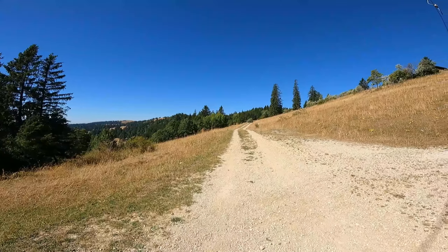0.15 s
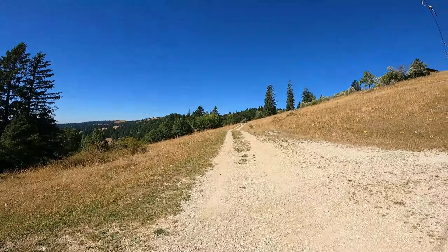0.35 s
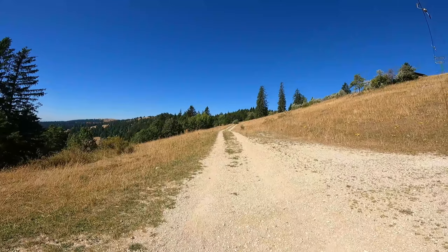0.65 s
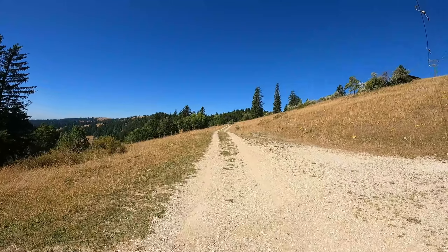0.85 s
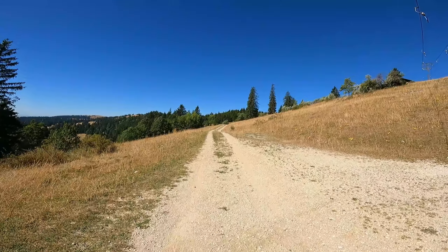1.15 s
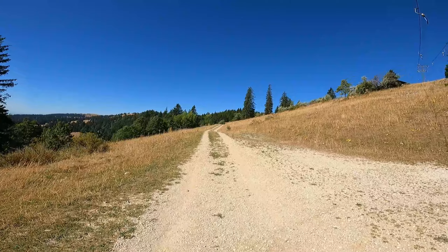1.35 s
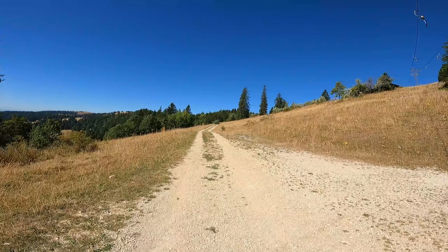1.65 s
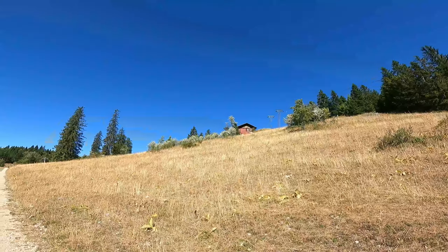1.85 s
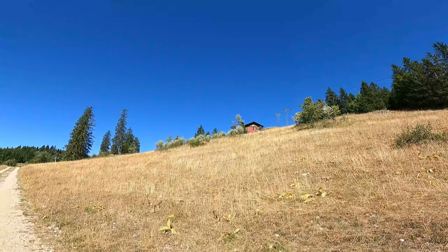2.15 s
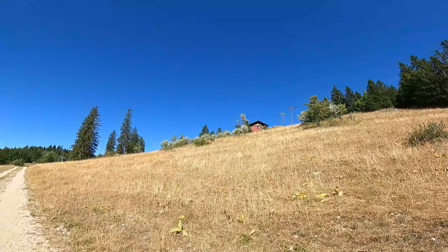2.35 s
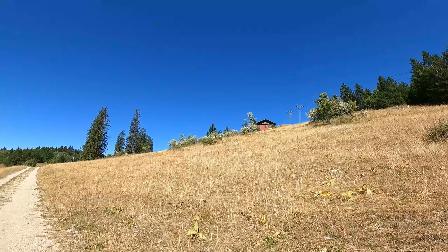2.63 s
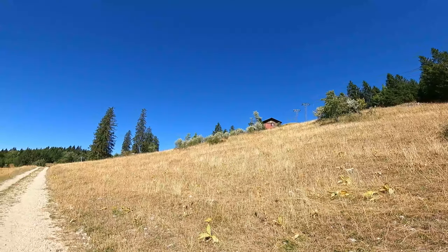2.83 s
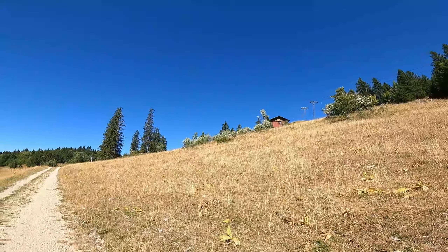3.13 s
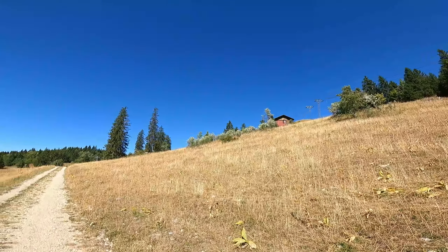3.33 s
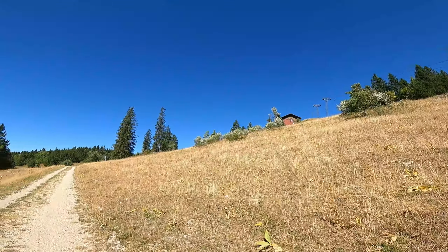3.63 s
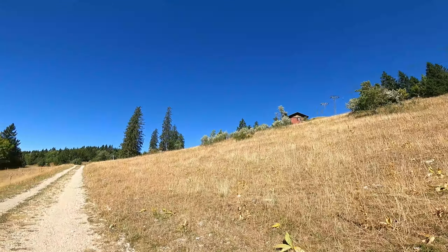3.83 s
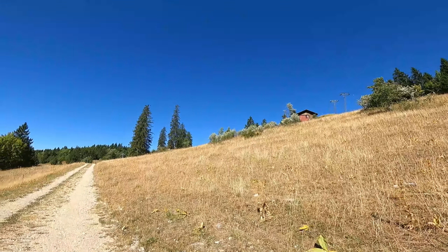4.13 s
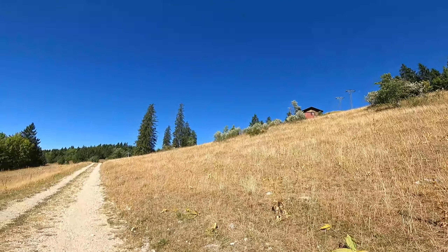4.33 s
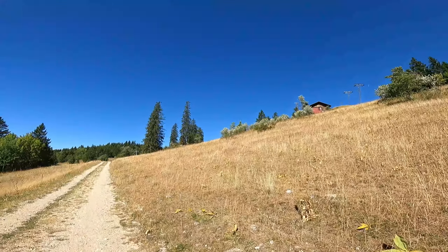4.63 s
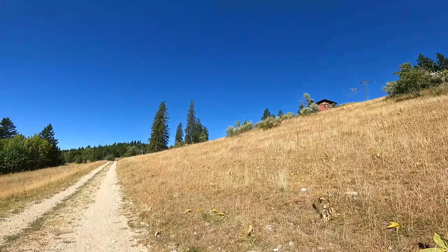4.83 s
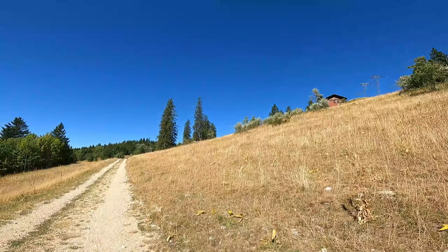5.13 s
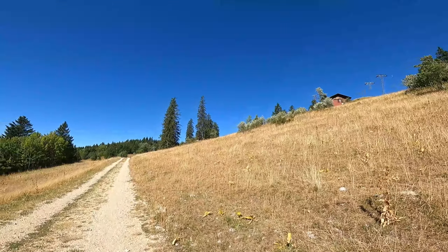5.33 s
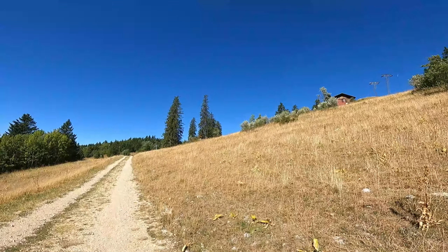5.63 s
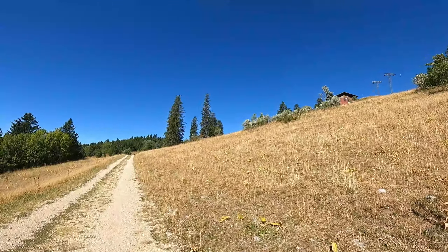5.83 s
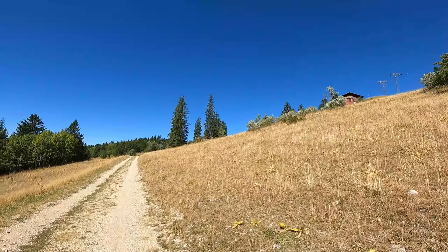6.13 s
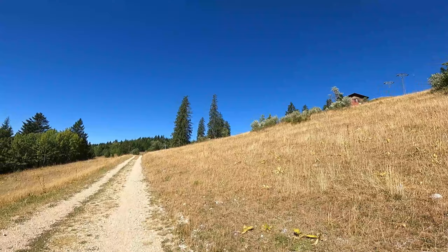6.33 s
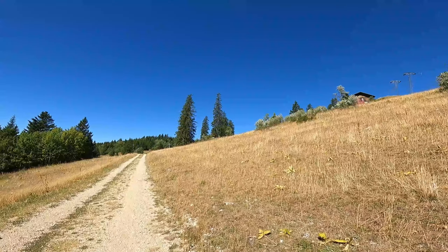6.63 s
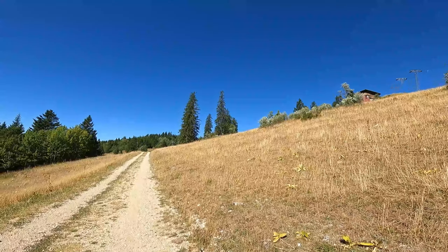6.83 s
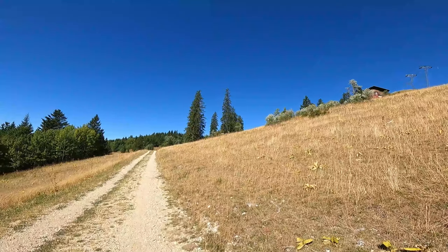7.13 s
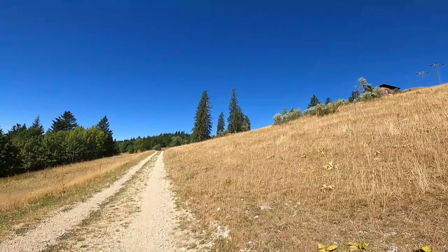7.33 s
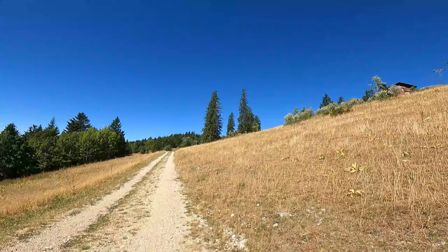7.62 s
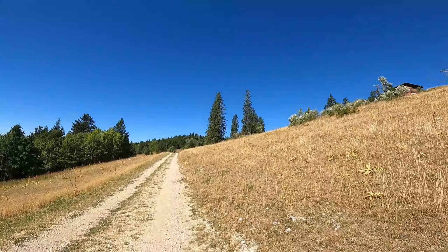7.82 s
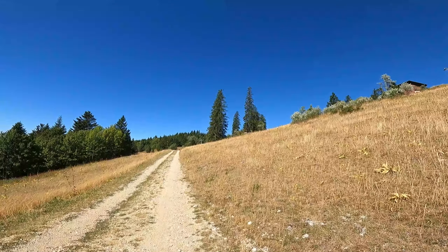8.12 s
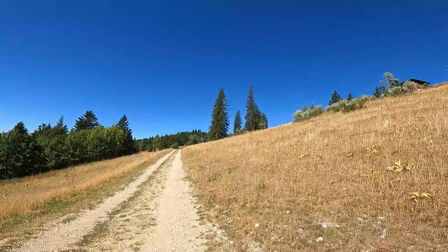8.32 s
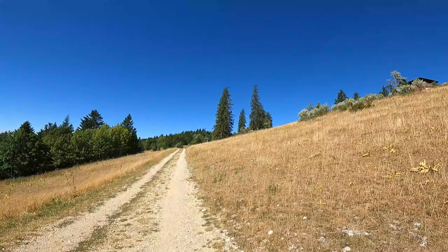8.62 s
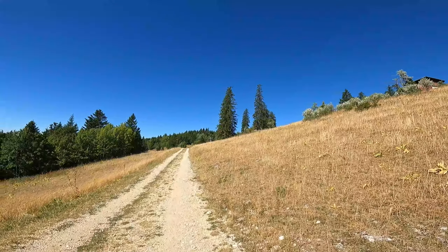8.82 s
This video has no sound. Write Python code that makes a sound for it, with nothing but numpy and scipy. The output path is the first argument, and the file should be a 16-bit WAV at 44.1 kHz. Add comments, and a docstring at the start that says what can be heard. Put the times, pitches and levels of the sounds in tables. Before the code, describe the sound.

Outdoors on an open grassy hillside, one walker crunches along a stony track, scuffing between footfalls. Puffs of wind slap the handheld microphone early, calm down, then return hard and hoarse past five seconds. Small stones squeak, a metal fitting clinks faintly, and a very faint, high grasshopper rasp pulses in the calmer middle over soft airy hiss.

```python
"""A walker's boots crunch along a dry gravel track, heard from a small hand-held camera in gusty wind.
Stones of three sizes grind as clumpy noise, louder at each footfall and scuff, over a steady bed.
Single pebbles pop, grit snaps, stones squeak and a metal fitting clinks, each from a list of times.
Wind is low noise with gusts and puffs; a grasshopper rasps in pulsed high noise over soft hiss.
The sound starts in stereo, dips briefly, goes on in mono and fades out at the end."""
import sys
import numpy as np
from scipy import signal
from scipy.fft import rfft, irfft, next_fast_len
from scipy.io import wavfile
from scipy.ndimage import uniform_filter1d, map_coordinates

SR = 44100
rng = np.random.default_rng(int(sys.argv[2]) if len(sys.argv) > 2 else 0)


def transcribe(signal):
    """Save signal, clipped to [-1, 1], as a 16-bit WAV file at the path in sys.argv[1]."""
    frames = np.atleast_2d(signal).T
    limited = np.clip(frames, -1, 1)
    pcm = np.round(limited * 32767).astype(np.int16)
    wavfile.write(sys.argv[1], SR, pcm)


N = 395577
MONO_S = 1.815  # stereo turns to mono here

# footfalls: t/s, hold/s, rise/(dB/s), fall/(dB/s), crunch level/dB,
# then big stones, grit and heel thud, each level/dB over the crunch
FOOTFALLS = [(0.285, 0.0041, 223, 180, -52, 2.5, -8.5, -11), (.897, 0, 170, 220, -48.5, -10, -12.5, 2),
             (1.438, 0, 137, 152, -52, -4.5, -11, -7), (2.033, 0.011, 520, 99, -47, 3.5, -12, 0),
             (2.599, 0, 334, 110, -52.5, 3, -10.5, 15.5), (3.225, 0.051, 303, 90, -53.5, -4.5, -17, -16),
             (3.885, 0.0035, 150, 137, -52, -5, -21, -24), (4.388, 0.064, 267, 94, -56.5, 3, -13, 14),
             (5.041, 0.026, 106.5, 150, -52, 1, -22, -1), (5.606, 0, 483, 320, -40.5, -7.5, -18.5, -10),
             (6.277, 0, 253, 136, -42.5, -1.5, -15.5, -21),
             (6.833, 0.079, 420, 280, -43.5, -2.5, -22.5, 5.5), (7.419, 0.053, 153, 131, -51, 0.5, -9.5, 1),
             (8.068, 0.011, 81, 270, -48.5, 2, -12.5, 7.5), (8.587, 0.024, 130, 169, -47, 0, -21.5, 6)]
# brief scuffs of heel, toe and sole: t/s, crunch level/dB, big stones and grit, each level/dB over the crunch
SCUFF_TIMES = [(0.176, -52.5, 1.5, -16), (0.763, -52.5, 2, -9), (1.104, -51.5, -1, -6),
               (1.237, -60, 14.5, -20), (1.323, -54, -3, -10), (2.197, -49.5, -1.5, -14.5),
               (2.448, -59, -1, -15), (2.67, -50, -4, -17), (3.04, -62, 1.5, -24), (3.235, -52.5, 8.5, -13),
               (3.481, -48.5, 5, -12), (3.583, -65, 8, -23), (3.783, -54, -21, -30),
               (4.254, -60.5, -23, -17), (4.455, -54.5, 10.5, -14), (5.159, -55.5, 5.5, -21),
               (5.525, -41, 10, -22), (5.68, -40, -15, -27), (5.933, -57, 5, -13.5),
               (6.227, -34.5, -1, -15), (6.32, -40, -7.5, -18), (6.474, -51.5, -11, -12.5),
               (6.721, -44.5, 10.5, -25), (6.89, -50.5, -8.5, -7), (7.173, -51.5, 5, -21),
               (7.392, -55.5, 6.5, 0), (7.525, -50.5, -0.5, -14), (7.734, -52.5, 4, -13),
               (7.796, -43, -14.5, -30), (8.387, -50, 15, -14)]


def amp(db):
    """Turn decibels into a plain multiplier."""
    return 10 ** (np.asarray(db) / 20)


def unit(x):
    """Scale x to an rms (average strength) of 1."""
    return x / np.sqrt(np.mean(x ** 2) + 1e-20)


def curves(rows):
    """Draw straight lines between table rows: one value per sample for each column after the time."""
    s, *columns = np.transpose(rows)
    return [np.interp(np.arange(N) / SR, s, column) for column in columns]


def wobble(rate):
    """A smooth random curve through rate random points a second."""
    t = np.arange(0, N + 16, 16) / SR
    points = rng.standard_normal(int(N * rate / SR) + 4)
    smooth = map_coordinates(points, [t * rate])
    return np.interp(np.arange(N) / SR, t, smooth)


def coloured(x, spectrum):
    """Filter x to a spectrum given as f/Hz and level/dB points on a log axis, then bring it to rms 1."""
    m = next_fast_len(N + 8192, True)
    f, db = np.transpose(spectrum)
    log_f = np.log(np.fft.rfftfreq(m, 1 / SR) + 1)
    gain = amp(np.interp(log_f, np.log(f + 1), db))
    return unit(irfft(rfft(x, m) * gain, m)[..., :N])


def evened(x, share):
    """Take out part of the chance swells of x, so the typed levels shape its loudness."""
    power = signal.filtfilt(*signal.butter(1, 9, fs=SR), x * x)
    return unit(x * (np.abs(power) + .02) ** (-share / 2))


def bursts(s, db, rise, fall, hold=0):
    """Summed power of events that climb to db at s, hold for hold seconds and sink; slopes in dB a second."""
    t = np.arange(0, N, 64)[:, None] / SR
    before, after = (s - t) * rise, (t - s - hold) * fall
    drop = np.clip(np.maximum(before, after), 0, 150)
    power = np.sum(amp(2 * (db - drop)), axis=1)
    return np.interp(np.arange(N) / SR, t[:, 0], power)


def swell(u):
    """A soft hump that rises from 0 to 1 at u = 1 and dies away."""
    return (u * np.exp(1 - u)) ** 1.98


def add_at(out, s, x):
    """Mix the short sound x into out, starting at s seconds."""
    out[round(s * SR):][:len(x)] += x


def placed(x, other, lean_db, apart):
    """In the stereo part, lean x to the left (right if negative) and add other with opposite signs."""
    wide = np.arange(N) < MONO_S * SR
    lean = np.tanh(lean_db * np.log(10) / 40)  # makes left minus right equal lean_db
    side = wide * (lean * x + apart * other)
    return np.array([x + side, x - side])


def smeared(x, t60):
    """Pass x through a very short random echo, as the camera body scatters it."""
    t = np.arange(400) / SR
    echo = rng.standard_normal(len(t)) * amp(-60 * t / t60)
    return signal.fftconvolve(x, echo / np.linalg.norm(echo))[:N]


def contacts(share, spread_db, fine_noise):
    """Sparse stone contacts of exponentially spread size (in dB) with fine noise under them."""
    hit = rng.random(N) < share
    size_db = spread_db * np.minimum(rng.exponential(size=N), 2.6)
    sign = rng.choice([-1, 1], N)
    return unit(hit * amp(size_db) * sign) + fine_noise * rng.standard_normal(N)


def chips(count, hz, octaves, cycles, spread_db):
    """Stones tick for a few cycles at random times, each at its own pitch."""
    row = rng.random((count, 2))
    pitch = hz * 2 ** (octaves * rng.standard_normal((count, 1)))
    u = np.arange(256) / SR * pitch / cycles
    tick = u * np.exp(-3 * u) * np.sin(2 * np.pi * cycles * u)
    size = amp(-spread_db * np.log(np.maximum(row[:, :1], .05)))
    where = (row[:, 1:] * N).astype(int) + np.arange(256)
    mixed = np.bincount(where.ravel(), (size * tick).ravel(), minlength=N)
    return unit(mixed[:N])


def pressure(step_db, scuff_db, bed_db):
    """How loud one size of stone is: powers of footfalls, scuffs and the steady bed add up."""
    s, hold, rise, fall, db = np.transpose(FOOTFALLS)[:5]
    scuff_s, scuff_crunch_db = np.transpose(SCUFF_TIMES)[:2]
    steps = bursts(s, db + step_db, rise, fall, hold)
    scuffs = bursts(scuff_s, scuff_crunch_db + scuff_db, rise=860, fall=920)
    return np.sqrt(steps + scuffs + amp(bed_db) ** 2)


def tread():
    """Stones of three sizes grind in clumps; some contacts shake all sizes at once; the heel thuds."""
    # steady bed of gravel-like noise under the footfalls:
    # t/s, crunch level/dB, big stones and grit, each level/dB over the crunch
    bed = [(0.0, -69, 0, 1.5), (1.0, -65.5, -4.5, -5), (1.7, -69.5, 0, 0.5), (1.9, -65, 0.5, -19),
           (2.9, -73, 2, -3), (3.2, -65.5, -5.5, -30), (3.75, -65, -1, -18), (4.1, -73, 5.5, -3.5),
           (4.8, -76, 7, -16), (5.44, -66.5, 12.5, -4.5), (5.75, -58, 3.5, -11), (6.03, -63, -1.5, -11),
           (6.16, -59, -0.5, -30), (6.45, -61.5, 3, -17), (7.0, -57.5, 3, -13), (7.15, -61.5, 4, -14.5),
           (7.65, -64, 2.5, -16.5), (8.2, -60, 3.5, -14), (8.97, -60, 1.5, -10.5)]
    # spectra of big stones, crunch of smaller stones, fine grit and heel thud: f/Hz, level/dB
    stone_spectrum = [(120, -27.5), (280, 0.5), (480, 1), (700, -3.5), (1000, -28), (2000, -42),
                      (6000, -120)]
    crunch_spectrum = [(300, -21.5), (800, -8), (1300, 1.5), (1800, -4), (2500, -8.5), (3500, -13),
                       (6000, -47), (12000, -120)]
    grit_spectrum = [(1500, -24.5), (3500, 3.5), (5000, 1), (7500, -14), (9000, -21), (12000, -37),
                     (16000, -42.5)]
    thud_spectrum = [(110, -8.5), (230, -2.5), (330, -9), (480, -10.5), (900, -37), (3000, -120)]
    s, *_, db, stones_db, grit_db, thud_db = np.transpose(FOOTFALLS)
    scuff_stones_db, scuff_grit_db = np.transpose(SCUFF_TIMES)[2:]
    bed_db, bed_stones_db, bed_grit_db = curves(bed)

    slow = wobble(38)
    clumps = 0.54 * slow + 0.71 * wobble(170)
    shared = contacts(.004, spread_db=4.0, fine_noise=0.93)

    big = chips(count=2400, hz=582, octaves=0.41, cycles=2.04, spread_db=6.5)
    stones = (0.95 * coloured(shared, stone_spectrum) + big) * unit(amp(2.9 * clumps))

    small = chips(count=3800, hz=1407, octaves=0.45, cycles=2.7, spread_db=3.0)
    crunch = (0.8 * coloured(shared, crunch_spectrum) + small) * unit(amp(2.73 * clumps))

    fine = 0.18 * shared + contacts(.008, spread_db=1.0, fine_noise=1.0)
    flicker = unit(amp(1.5 * slow + 1.2 * clumps + 1.9 * wobble(120)))
    grit = coloured(fine, grit_spectrum) * flicker

    thud = coloured(shared, thud_spectrum) * np.sqrt(bursts(s, db + thud_db, rise=510, fall=380))
    crunch_push = pressure(0, 0, bed_db)
    stones_push = pressure(stones_db, scuff_stones_db, bed_db + bed_stones_db)
    grit_push = pressure(grit_db, scuff_grit_db, bed_db + bed_grit_db)
    return crunch_push * crunch + thud + stones_push * stones + grit_push * grit


def wind():
    """Eddies push the membrane in lumps; strong gusts add a faster, hoarser flutter."""
    # wind between gusts: t/s, buffet level/dB, flutter level/dB, hoarse edge level/dB over the flutter
    steady_wind = [(0.0, -30, -56, -28), (.5, -32, -53.5, -7.5), (.58, -27, -28, -43),
                   (.7, -31, -33.5, -14), (.82, -50, -59, -18.5), (1.35, -32, -54.5, -2.5),
                   (1.52, -41.5, -67, 6), (1.95, -35.5, -53, -11.5), (2.25, -38.5, -51.5, -10),
                   (2.45, -34, -51.5, -13), (2.72, -39.5, -48.5, -12), (3.12, -43, -54, -16),
                   (3.7, -42.5, -49.5, -20), (4.3, -40.5, -53.5, -9), (4.92, -40.5, -53, -16.5),
                   (5.18, -23, -27, -8), (5.45, -20.5, -25, -1), (5.59, -18.5, -28, 1.5),
                   (5.66, -22.5, -32, -2), (5.9, -25, -33.5, -9), (6.44, -27, -38, -14),
                   (7.27, -27, -40.5, -8.5), (7.5, -26.5, -36.5, -6.5), (7.7, -20, -27, -9),
                   (7.94, -22, -37.5, -7), (8.1, -22.5, -32, -5), (8.3, -20.5, -35, -9),
                   (8.97, -19.5, -32.5, -11)]
    # short gusts: t/s, buffet level/dB, flutter level/dB
    gust_rows = [(.12, -55, -57), (.27, -22, -30), (.65, -31, -48), (0.768, -25.5, -33.5),
                 (0.902, -21, -28.5), (1.07, -26, -55), (1.2, -26.5, -57), (1.7, -31, -65),
                 (2.11, -30, -55), (2.52, -34, -43), (2.95, -31.5, -42), (3.82, -30.5, -38.5),
                 (3.92, -29.5, -46), (4.07, -31.5, -48), (4.37, -41, -43.5), (4.77, -33.5, -65),
                 (5.02, -32.5, -35.5), (5.12, -36, -25.5), (5.791, -14.5, -29), (5.95, -22, -40),
                 (6.12, -25.5, -44), (6.3, -19, -36.5), (6.49, -28, -38), (6.64, -27, -37.5),
                 (6.949, -18.5, -25.5), (7.14, -13, -27), (7.371, -15, -30.5), (7.59, -28, -30),
                 (7.81, -20, -31), (8.02, -20, -29), (8.18, -32, -47), (8.39, -20, -26.5), (8.52, -24, -29),
                 (8.691, -21, -32)]
    # spectra of slow buffet, faster flutter and hoarse edge: f/Hz, level/dB
    buffet_spectrum = [(10, -5.5), (28, 0.5), (60, -1), (90, -5), (130, -15.5), (200, -30.5), (400, -54),
                       (900, -120)]
    flutter_spectrum = [(60, -30), (105, 2), (150, 2), (220, -7), (350, -29), (900, -120)]
    hoarse_spectrum = [(120, -22), (230, -1), (320, -4.5), (450, -14.5), (700, -31.5), (1100, -41.5),
                       (3000, -47), (9000, -120)]
    buffet_db, flutter_db, edge_db = curves(steady_wind)
    s, gust_db, flap_db = np.transpose(gust_rows)
    gusts = bursts(s, gust_db, rise=202, fall=200)
    flaps = bursts(s, flap_db, rise=230, fall=304)
    buffet = np.sqrt(amp(buffet_db) ** 2 + gusts)
    flutter = np.sqrt(amp(flutter_db) ** 2 + flaps)
    hoarse = amp(edge_db) * np.sqrt(amp(flutter_db) ** 2 + .4 * flaps)

    # two rows of noise each: the main sound and the part that sets left and right apart
    eddies = wobble(24)
    low = evened(coloured(rng.standard_normal((2, N)), buffet_spectrum), share=0.53)
    low = low * unit(amp(0.89 * eddies))
    mid = evened(coloured(rng.standard_normal((2, N)), flutter_spectrum), share=0.26)
    mid = mid * unit(amp(1.5 * eddies))
    rough = unit(amp(1.4 * eddies + 2.4 * wobble(50) + 3.5 * wobble(140)))
    high = coloured(rng.standard_normal((2, N)), hoarse_spectrum) * rough
    near, far = buffet * low + flutter * mid + hoarse * high
    return placed(near + puffs(), far, lean_db=-5.5, apart=0.27)


def air():
    """Dry grass rustles far off over the microphone's own hiss; both are filtered noise."""
    # open-air hiss: t/s, hiss level/dB, top hiss level/dB
    air_levels = [(0.0, -64, -82), (1.7, -65.5, -85.5), (1.9, -70.5, -83.5), (5.2, -68.5, -91.5),
                  (5.64, -68.5, -100), (6.3, -66.5, -90.5), (6.9, -63.5, -90), (7.2, -66, -102),
                  (8.97, -65.5, -97)]
    # spectra of the grass hiss and the top hiss: f/Hz, level/dB
    grass_spectrum = [(500, -7), (1500, 8.5), (3000, -1.5), (5000, -4), (7800, -6), (9200, -15),
                      (11000, -20.5), (16000, -60.5)]
    top_spectrum = [(6000, -41), (9500, 2.5), (12500, -0.5), (16000, -2.5)]
    hiss_db, top_db = curves(air_levels)
    grass = coloured(rng.standard_normal((2, N)), grass_spectrum) * amp(hiss_db + 2.2 * wobble(14))
    top = coloured(rng.standard_normal((2, N)), top_spectrum) * amp(top_db)
    return placed(*grass, lean_db=2.5, apart=0.74) + placed(*top, lean_db=16.5, apart=.9)


def puffs():
    """A sudden puff slaps the membrane into a few dying cycles."""
    # puffs: t/s, level/dB, pitch f/Hz
    puff_rows = [(0.104, -11.5, 102), (0.221, -16, 75), (0.273, -9.5, 90), (0.554, -20.5, 170),
                 (0.63, -15, 151), (0.743, -10, 85), (0.839, -25.5, 310), (0.897, -34, 151),
                 (5.153, -11, 153), (5.18, -11, 205), (5.212, -3.5, 130), (5.289, -16.5, 200),
                 (5.307, -13, 130), (5.33, -23.5, 151), (5.364, -8, 177), (5.383, -4.5, 196),
                 (5.439, -2.5, 294), (5.52, -7, 182), (5.461, -11, 200), (5.564, -26, 269),
                 (5.586, -19, 170), (5.71, -29.5, 248), (6.107, -12, 151), (6.922, -36, 167),
                 (7.528, -22, 151), (7.548, -11.5, 130), (7.554, -11.5, 302), (7.588, -9.5, 100),
                 (7.604, -8.5, 232), (7.688, -16, 233), (7.712, -17, 237), (7.772, -11.5, 150),
                 (7.986, -21, 151), (8.085, -29, 229), (8.34, -28, 151), (8.379, -16, 153)]
    out, t = np.zeros(N + SR), np.arange(SR // 10) / SR
    for s, db, hz in puff_rows:
        fade = amp(db - 60 * t * hz / 5)  # falls 60 dB in five cycles
        onset = 1 - np.exp(-t * hz / 0.32)
        add_at(out, s, fade * onset * np.sin(2 * np.pi * hz * t))
    return out[:N]


def pebbles():
    """A slipping pebble gives a soft cycle or two at its pitch, higher edge tones and a short rattling tail."""
    # single pebbles that slip: t/s, level/dB, pitch f/Hz, edge level/dB over the body, length of ring in cycles
    pop_rows = [(0.116, -41, 1900, -13, 1.2), (0.154, -37, 1180, -21, 2.2), (0.184, -35.5, 1140, -30, 1.2),
                (.197, -40, 1800, -20, 1.3), (.206, -40, 1900, -20, 1.3), (0.224, -34.5, 1610, -20, 1.3),
                (.238, -36, 1500, -20, 1.3), (0.282, -36, 1300, -7, 0.98), (0.292, -30.5, 1800, -17, 1.2),
                (0.332, -26.5, 1156, -11, 0.31), (0.418, -38, 1900, -15, 2.3), (0.759, -36, 1400, -31, 3.3),
                (0.793, -33, 760, -26, 0.7), (.877, -37, 1290, -12, 1.2), (.889, -41, 1650, -12, 1),
                (.899, -36, 1500, -18, 1.2), (.907, -34, 1500, -5, 1), (0.911, -17, 1470, -33, 0.55),
                (0.914, -36, 1500, -6, 1), (.929, -42, 1300, -16, 0.9), (0.945, -20.5, 1316, -9, 2.1),
                (.951, -41, 1500, -6, 1), (.994, -46, 1720, -6, 1), (1.055, -38.5, 1500, -17, 1.2),
                (1.094, -30, 1130, -6.5, 1.3), (1.109, -36, 950, -20, 0.72), (1.175, -45, 1300, -25, 1.6),
                (1.211, -42, 1500, -27, 1.6), (1.234, -23, 1170, -21, 1.4), (1.267, -24.5, 1180, -16, 1.7),
                (1.359, -40, 1800, -25, 1.4), (1.368, -37, 1340, -18, 1.1), (1.389, -33, 1130, -22, 0.84),
                (1.393, -35.5, 1890, -18, 1.6), (1.421, -38, 730, -17, 1.4), (1.429, -38, 1500, -10, 1),
                (1.447, -30.5, 1166, -13, 0.77), (1.461, -34, 1200, -17, 1.2), (1.468, -34.5, 1300, -17, 1),
                (1.973, -25.5, 1620, -37, 2.2), (2.01, -37.5, 762, -18, 2), (2.027, -35, 800, -6, 1.5),
                (2.041, -38, 694, -20, 1.5), (2.052, -31.5, 2200, -12, 1.2), (2.065, -32, 647, -18, 1.3),
                (2.072, -38, 1900, -20, 1.2), (2.08, -30, 770, -30, 1.6), (2.092, -36, 900, -20, 1.1),
                (2.097, -36, 1200, -18, 1.1), (2.143, -36, 891, -34, 1.5), (2.162, -22, 1190, -34, 1.55),
                (2.171, -33, 1670, -22, 2.1), (2.194, -35, 1200, -25, 1.4), (2.205, -22.5, 790, -36, 1),
                (2.26, -38.5, 1000, -20, 1.1), (2.434, -45, 1500, -11, 1.1), (2.455, -38, 1310, -43, 2.1),
                (2.536, -36, 1010, -33, 1.2), (2.549, -39, 1100, -29, 1.4), (2.575, -37, 600, -25, 1.2),
                (2.582, -39, 600, -25, 1.1), (2.594, -38, 700, -22, 0.96), (2.603, -45, 1710, -20, 1.5),
                (2.638, -41, 1200, -20, 1), (2.646, -43, 1500, -9, 1.1), (2.655, -34, 1280, -14, 1.4),
                (2.67, -29, 980, -29, 1.4), (2.68, -39, 1300, -25, 1.2), (2.691, -36, 1380, -25, 1.8),
                (2.701, -40, 1100, -25, 1.3), (2.711, -43, 1390, -25, 1.3), (2.727, -46.5, 1500, -4, 1),
                (3.026, -37, 1400, -30, 3.4), (3.069, -33.5, 1710, -31, 2.2), (3.193, -40, 1800, -19, 2),
                (3.209, -38, 556, -15, 1.3), (3.219, -45, 2500, -12, 1.2), (3.232, -39, 2440, -10, 1.2),
                (3.237, -39, 860, -6, 1.2), (3.243, -38, 1000, -20, 1.1), (3.26, -30, 1180, -11, 1.3),
                (3.282, -37, 1200, -25, 1.8), (3.299, -37, 1500, -8, 1), (3.302, -44, 1300, -15, 1.2),
                (3.323, -32, 1370, -36, 2), (3.349, -49, 1600, -25, 1.4), (3.369, -43, 1600, -20, 1.7),
                (3.395, -39, 1400, -28, 1.7), (3.477, -17.5, 1436, -39, 1.4),
                (3.572, -42.5, 1190, -29, 2.3), (3.748, -34, 1710, -19, 2), (3.772, -39, 1250, -25, 1.8),
                (3.801, -40, 1250, -25, 2), (3.851, -43, 1600, -17, 1.1), (3.874, -34, 1160, -19, 1.2),
                (3.899, -40, 1800, -22, 1.7), (3.918, -42, 1700, -15, 1.2), (3.971, -41, 1500, -15, 0.83),
                (4.206, -42.5, 1410, -20, 1.6), (4.237, -46, 1420, -8, 1.6), (4.257, -42, 1790, -23, 1.9),
                (4.354, -35.5, 837, -24, 0.97), (4.383, -35, 1480, -18, 1.2), (4.389, -42, 2800, -4, 1.1),
                (4.398, -40, 800, -0.5, 1.2), (4.41, -51, 2020, -17, 1.2), (4.441, -32.5, 1000, -25, 1.8),
                (4.449, -40, 1000, -15, 1.2), (4.455, -37, 1000, -20, 1.4), (4.474, -34, 1096, -25, 1.3),
                (4.482, -29.5, 990, -25, 0.87), (4.501, -48, 1700, -14, 1.1),
                (4.524, -37.5, 1320, -31, 1.4), (4.564, -42, 1400, -23, 2.9), (4.947, -37, 1460, -29, 1.4),
                (5.021, -33, 1000, -29, 1.5), (5.036, -26, 1725, -31, 2.1), (5.154, -36, 724, -21, 1.1),
                (5.167, -36.5, 1500, -24, 1.6), (5.206, -29.5, 730, -26, 0.58),
                (5.393, -33, 1300, -34, 1.4), (5.468, -34, 675, -28, 2.7), (5.474, -15.5, 1133, -24.5, 1.7),
                (5.523, -14.5, 687, -12.5, 0.94), (5.549, -36, 1800, -20, 1.4),
                (5.558, -41.5, 2990, -14, 1.5), (5.57, -38.5, 3000, -11, 1.6), (5.602, -28.5, 837, -4.5, 1),
                (5.609, -29, 1820, -9, 1.2), (5.622, -33, 1500, -17, 1.2), (5.648, -28.5, 1330, -19, 1.2),
                (5.655, -34, 1400, -17, 1.2), (5.662, -33.5, 1250, -22, 1.6),
                (5.678, -16.5, 748, -13, 0.53), (5.692, -38.5, 2300, -20, 1.5),
                (5.753, -36, 1350, -16, 1.1), (6.092, -39, 1460, -28, 2.6), (6.161, -30.5, 1410, -16, 1.3),
                (6.184, -41, 1500, -18, 1.6), (6.195, -41, 1500, -15, 1.2), (6.204, -42, 1770, -20, 1.8),
                (6.227, -22, 1160, -17, 1), (6.233, -27.5, 1530, -13, 1), (6.244, -37, 1800, -14, 1.1),
                (6.264, -29.5, 1100, -21.5, 1.3), (6.271, -32.5, 1200, -16, 1.2),
                (6.282, -12.5, 1195, -24, 1.17), (6.317, -24, 1650, -10, 1.7),
                (6.326, -30, 1116, -8.5, 0.94), (6.355, -34, 1880, -18, 1.3), (6.4, -31.5, 1426, -24, 1.7),
                (6.477, -29, 713, -31, 1.4), (6.68, -23, 1166, -26, 0.92), (6.714, -18.5, 1184, -21, 1.8),
                (6.761, -23, 1237, -21, 1.9), (6.781, -28, 763, -25, 1.4),
                (6.8248, -9.5, 1440, -48.5, 0.97), (6.839, -32, 1296, -14, 1.1),
                (6.852, -33.5, 900, -17, 1.2), (6.858, -35, 2200, -10, 1.2), (6.867, -32, 1000, -7.5, 1.2),
                (6.872, -38, 1810, -13, 1.1), (6.885, -32, 1200, -20, 1.3), (6.9, -31, 1500, -10, 1.1),
                (6.914, -16, 1220, -20, 2.16), (6.926, -40, 1500, -19, 1.3), (7.165, -25.5, 1740, -26, 1.4),
                (7.285, -36, 1180, -40, 1.3), (7.347, -41, 1500, -23, 1.8), (7.408, -32, 802, -21.5, 1.1),
                (7.422, -28.5, 1290, -17, 1.4), (7.429, -27, 780, -26, 0.98),
                (7.449, -29.5, 1084, -28, 2.6), (7.46, -40, 900, -10, 1), (7.465, -26, 1060, -27, 1.7),
                (7.492, -41.5, 1460, -13, 1.1), (7.497, -35, 1300, -20, 1.6), (7.514, -33, 1296, -17, 1),
                (7.524, -32, 751, -16, 1.4), (7.532, -28.5, 1500, -19, 1.2), (7.742, -23, 1210, -40, 0.89),
                (7.781, -31.5, 1500, -21.5, 1.2), (7.784, -35, 2400, -19, 1.6),
                (7.795, -14, 1580, -22, 1.5), (7.874, -46, 1900, -12, 1.3), (7.975, -38, 1800, -11, 1.1),
                (8.013, -32.5, 773, -12, 1.6), (8.051, -28.5, 1400, -2.5, 1.5),
                (8.057, -32, 1500, -15, 1.2), (8.076, -15, 1353, -27, 1.12), (8.248, -33.5, 1280, -15, 1.1),
                (8.384, -14.5, 1127, -41, 1.45), (8.491, -42, 1480, -25, 1.8), (8.498, -33, 650, -26, 1.6),
                (8.539, -37, 1400, -25, 1.6), (8.553, -42, 1500, -8, 1), (8.561, -44, 1900, -10, 1.1),
                (8.572, -32, 2140, -15, 1.3), (8.58, -26, 1990, -9, 1.4), (8.589, -22, 1910, -14.5, 1.45),
                (8.617, -39, 1990, -15, 1.2), (8.628, -41, 1200, -12, 1.1), (8.64, -27, 637, -21, 2),
                (8.6487, -23.5, 1610, -35, 1.6), (8.664, -29.5, 1310, -16, 1.2)]
    out, t = np.zeros(N + SR), np.arange(SR // 40) / SR
    for s, db, hz, edge_db, cycles in pop_rows:
        hump = swell(t * hz * 1.73 / np.clip(cycles, .6, 5))
        body = -hump * np.cos(2 * np.pi * hz * (t - .0009))

        low, high = 2200 + 900 * rng.random(), 3400 + 900 * rng.random()  # edge tones, Hz
        edge_tones = np.sin(2 * np.pi * low * t) + 0.43 * np.sin(2 * np.pi * high * t)
        edge = amp(edge_db) * swell(t / 0.00063) * edge_tones

        drift = np.cumsum(0.22 * uniform_filter1d(rng.standard_normal(len(t)), size=12))
        rattle = np.sin(2 * np.pi * hz * t + drift)
        tail = amp(-16 - 60 * t / .035) * (1 - np.exp(-t / .0015)) * rattle  # falls 60 dB in 0.035 s
        add_at(out, s, amp(db) * (body + edge + tail))
    return out[:N]


def clinks():
    """The fitting rings on a low mode that shifts with how it hangs, and on two close high pairs."""
    # clinks: t/s, low mode f/Hz, low mode level/dB, high pair level/dB, top pair level/dB
    clink_rows = [(.148, 4300, -75, -74, -95), (0.416, 4140, -57.5, -85, -95), (0.577, 4480, -55, -64, -85),
                  (1.42, 4300, -75, -74, -95), (1.702, 4300, -62, -67, -85), (1.872, 4300, -65, -71, -90),
                  (1.9, 4300, -64, -74, -90), (2.058, 4300, -75, -73, -86), (3.006, 4300, -58.5, -66, -79),
                  (4.142, 4300, -76, -75, -75.5), (4.246, 4300, -69, -77, -73),
                  (5.911, 4220, -62, -65, -72.5), (6.943, 4110, -42.5, -68, -86),
                  (7.095, 4120, -55.5, -84, -95), (7.6, 4270, -54.5, -81, -97),
                  (7.712, 4330, -62.5, -71, -83)]
    # modes of the metal, high pair then top pair: f/Hz, level/dB over its pair, time to fall 60 dB t60/s
    metal_modes = [(10400, -5.5, .07), (10640, 1.5, 0.066), (13300, -4, .07), (14120, -6.5, .07)]
    out, t = np.zeros(N + SR), np.arange(SR // 10) / SR

    def ring(hz, db, t60, rough):
        """A dying tone whose phase drifts at random."""
        drift = np.cumsum(rough * rng.standard_normal(len(t)))
        return amp(db - 60 * t / t60) * np.sin(2 * np.pi * hz * t + drift)

    for s, low_hz, low_db, high_db, top_db in clink_rows:
        clink = ring(low_hz, low_db, 0.078, rough=0.11)
        for (hz, own_db, t60), pair_db in zip(metal_modes, [high_db, high_db, top_db, top_db]):
            clink = clink + ring(hz, pair_db + own_db, t60, rough=.05)
        add_at(out, s, (1 - np.exp(-t / 0.0011)) * clink)
    return out[:N]


def snaps():
    """Cracking grit gives a short, bright burst of noise."""
    # snaps: t/s, level/dB
    snap_rows = [(0.152, -55), (0.2229, -62), (0.2756, -40.5), (.284, -40), (.292, -48), (0.333, -49),
                 (.339, -51), (0.417, -53), (0.5816, -54), (0.759, -47.5), (0.8425, -45), (0.8784, -46),
                 (.889, -56), (0.912, -43), (.917, -50), (.929, -58), (0.9446, -46), (0.9936, -51),
                 (1.052, -52), (1.093, -56), (1.2335, -49), (1.2665, -58), (1.4287, -51), (1.5903, -59),
                 (2.0176, -48), (2.5905, -55), (2.6449, -58), (3.2316, -54), (3.477, -67), (3.7765, -52),
                 (3.8736, -52), (4.397, -52), (4.455, -59), (4.507, -59), (5.524, -55), (5.6015, -66),
                 (5.6625, -61), (6.2168, -61), (6.2243, -60), (6.282, -53), (6.317, -53), (6.7111, -58),
                 (6.824, -50), (6.8644, -49), (6.8897, -50), (6.9127, -57), (7.384, -43), (7.4071, -41),
                 (7.4604, -48), (7.4924, -59), (7.5218, -54), (7.7942, -70), (8.0506, -55), (8.3815, -57),
                 (8.5737, -49)]
    out, t = np.zeros(N + SR), np.arange(SR // 40) / SR
    for s, db in snap_rows:
        smooth = np.convolve(rng.standard_normal(len(t) + 9), np.hanning(9), "valid")
        crackle = np.diff(smooth)[:len(t)]
        add_at(out, s, amp(db) * swell(t / 0.0013) * crackle)
    return out[:N]


def grasshopper():
    """In the dry grass a leg rasps the wing in even, short strokes: high noise that pulses."""
    # loudness of the rasp: t/s, level/dB
    hopper_levels = [(0, -120), (1.85, -120), (1.96, -87.5), (3.7, -91), (3.8, -100), (4.2, -90.5),
                     (5.4, -100.5), (5.6, -120), (8.97, -120)]
    # spectrum of the rasp: f/Hz, level/dB
    rasp_spectrum = [(11500, -33.5), (12800, -8), (13500, 1), (14300, -6), (15600, -15)]
    strokes_per_s, sharpness = 88, 3
    level_db, = curves(hopper_levels)
    turns = np.cumsum(strokes_per_s * (1 + .004 * wobble(3))) / SR
    strokes = np.exp(sharpness * np.cos(2 * np.pi * turns))
    rasp = unit(strokes * coloured(rng.standard_normal(N), rasp_spectrum))
    return amp(level_db + 1.5 * wobble(8)) * rasp


def squeaks():
    """Stones squeak past each other: a wavering tone stutters as they stick and slip."""
    # squeaks: start t/s, length/s, pitch f/Hz, level/dB
    squeak_rows = [(3.016, 0.033, 1500, -49), (5.5, 0.058, 2234, -38.5), (5.464, 0.036, 2600, -52),
                   (5.596, .02, 2070, -42), (5.653, 0.031, 2250, -40), (5.713, 0.022, 2530, -53),
                   (6.599, .05, 1343, -53), (6.696, 0.018, 1370, -43), (6.713, 0.035, 1250, -38.5),
                   (6.809, 0.038, 1830, -44), (6.82, 0.0079, 1690, -45), (7.164, 0.025, 1980, -50),
                   (7.464, 0.014, 1120, -44), (7.78, 0.031, 2025, -44.5), (7.806, .016, 1740, -46),
                   (7.816, .02, 1950, -46), (7.838, 0.0085, 2080, -49), (8.057, 0.041, 1415, -44),
                   (8.37, 0.012, 1380, -49.5), (8.404, 0.0096, 1415, -43), (8.595, 0.015, 2010, -41.5)]
    out, t = np.zeros(N + SR), np.arange(SR // 10) / SR
    stutter = amp(3.6 * wobble(170))
    for s, length, hz, db in squeak_rows:
        waver = np.cumsum(0.15 * rng.standard_normal(len(t)))
        tone = np.sin(2 * np.pi * hz * t + waver)
        arch = np.abs(np.sin(np.pi * np.minimum(t / length, 1))) ** 0.84
        add_at(out, s, amp(db) * arch * tone)
    return signal.lfilter(*signal.butter(3, 3200, fs=SR), out[:N] * stutter)  # soften the treble


def knocks():
    """A heavy stone tips over: a low thud and a higher crack, both very short tones."""
    # knocks: t/s, level/dB
    knock_rows = [(3.476, -23.5)]
    out, t = np.zeros(N + SR), np.arange(SR // 40) / SR
    for s, db in knock_rows:
        thud = swell(t / 0.0019) * np.sin(2 * np.pi * 230 * t)
        crack = 1.3 * swell(t / 0.0013) * np.sin(2 * np.pi * 640 * t)
        add_at(out, s, amp(db) * (thud + crack))
    return out[:N]


def scene():
    """Mix the walker's sounds, smeared a little to the sides, with wind, air and grasshopper."""
    single_stones = pebbles() + snaps() + knocks()
    single_stones = signal.lfilter(*signal.butter(2, 8000, fs=SR), single_stones)  # soften the treble
    feet = tread() + single_stones + squeaks() + clinks()
    walker = placed(feet, smeared(feet, t60=0.012), lean_db=6.0, apart=0.16)
    return walker + wind() + air() + grasshopper()


def record(dry):
    """The sound dips where it turns mono and fades at the end; nothing is kept above the band limit."""
    dip_out_s, dip_in_s = 0.1, 0.14
    end_s, end_fade_s = 8.916, 0.23
    top_hz = 15700
    t = np.arange(N) / SR
    dip = np.maximum((MONO_S - t) / dip_out_s, (t - MONO_S) / dip_in_s)
    ramp = np.minimum(dip, (end_s - t) / end_fade_s)
    floor = np.where(t < end_s, 0.028, 0.0048)  # the fades never reach full silence
    gain = np.clip(ramp, floor, 1) ** 1.09  # slightly bent fades
    m = next_fast_len(N + 8192)
    kept = np.fft.rfftfreq(m, 1 / SR) < top_hz
    return irfft(rfft(dry * gain, m) * kept, m)[:, :N]


dry = scene()
out = record(dry)
transcribe(out)
```